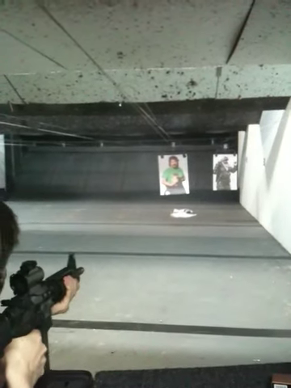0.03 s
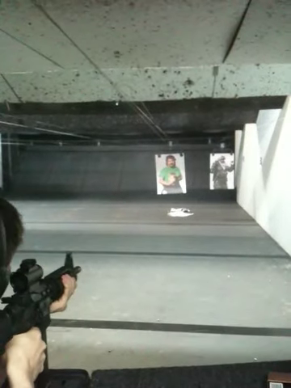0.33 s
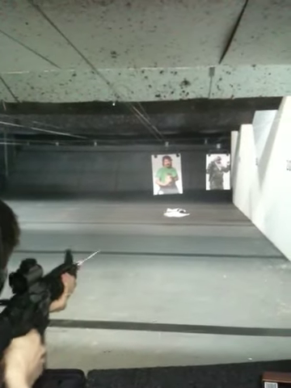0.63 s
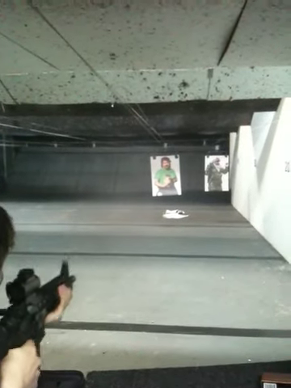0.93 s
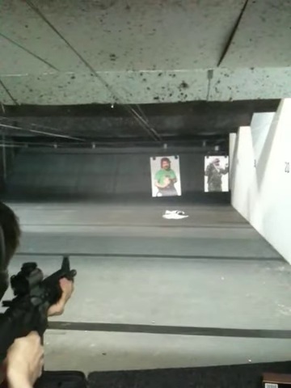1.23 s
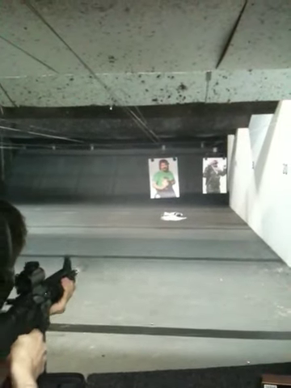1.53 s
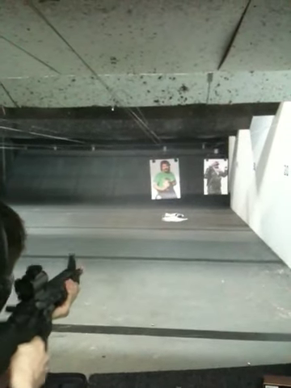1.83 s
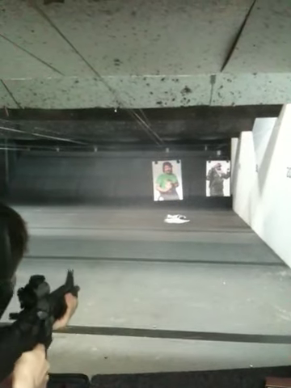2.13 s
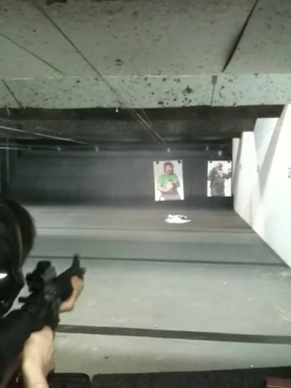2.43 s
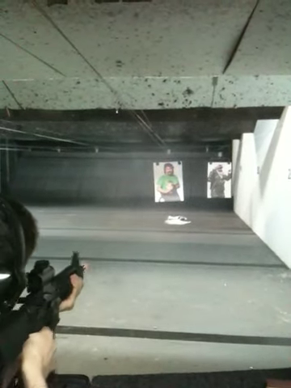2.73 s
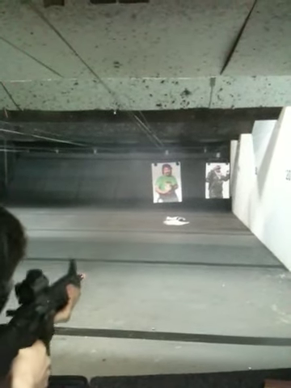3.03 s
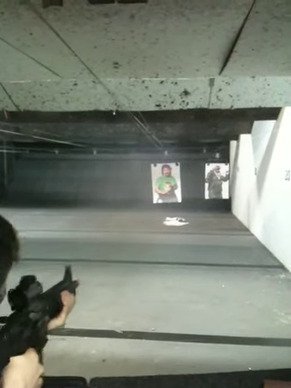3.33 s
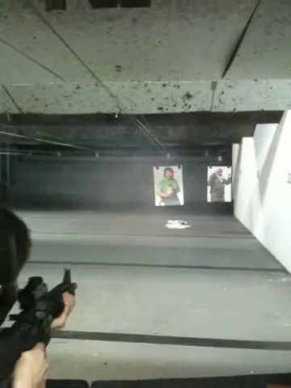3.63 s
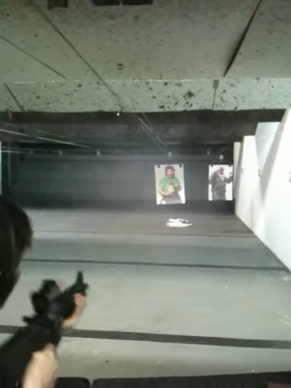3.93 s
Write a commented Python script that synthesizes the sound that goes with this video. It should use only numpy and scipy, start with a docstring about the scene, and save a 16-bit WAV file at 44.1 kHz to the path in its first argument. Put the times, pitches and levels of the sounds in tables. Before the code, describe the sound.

Rifle fire booms in a concrete shooting range while brass casings clink on the floor.

```python
"""Rifle shots in a concrete indoor range, heard from just behind the shooter.
First an earlier shot dies away while spent brass casings bounce on the floor and ring in their modes.
From 0.4 s, each muzzle blast and its dense reverberation overload the microphone for most of a second;
more casings sound as the tails decay. Lighter reports, probably from another lane, land inside the roar
at 2.1 s and 3.3 s, the second with a low push of air. A last blast follows at 3.7 s."""
import sys
import numpy as np
from scipy import signal
from scipy.fft import rfft, irfft, next_fast_len
from scipy.io import wavfile
from scipy.ndimage import map_coordinates

SR = 44100
rng = np.random.default_rng(int(sys.argv[2]) if len(sys.argv) > 2 else 0)


def store_pcm(level_fs):
    """Save levels as 16-bit WAV."""
    pcm = np.round(np.clip(level_fs, -1, 1) * 32767).astype(np.int16)
    wavfile.write(sys.argv[1], SR, np.atleast_2d(pcm).T)


N = 176400

# Shots: t/s, tail level 1 s later/dB, treble lift of the tail/dB, blast level over that tail level/dB
SHOT_EVENTS = [(-0.78, -22.7, -1.5, 40), (0.4103, -19.7, -1.5, 64), (1.5905, -23.5, 0, 48),
               (2.09, -47.5, 4.5, 44), (2.7472, -20, .5, 44), (3.272, -32.5, -3, 30), (3.68, -46, 5, 58)]
FLUTTER_DB, FLUTTER_RATE = .8, 22
def rifle_shot(onset, tail_db, lift_db, blast_db):
    """Superposition of blast and reverberation; uneven arrival of the echoes makes the level flutter."""
    age = since(onset)
    tail = reverberation(onset, lift_db)
    gain = amp(tail_db + FLUTTER_DB * wobble(FLUTTER_RATE))
    return gain * (age > 0) * (amp(blast_db) * muzzle_blast(age) + tail)


# Spectral density of the blast and its first reflections in the booth, at full flare: f/Hz, level/dB
BLAST_SPECTRUM = [(30, -26), (300, -10), (900, -9), (1650, 1), (2400, -7), (3300, -3), (4050, 3),
                  (5000, -9), (9000, -15), (16000, -25)]
FLARE_S, FLARE_WIDTH_S, FLARE_PITCH_DEPTH, FLARE_DB = .085, .055, .22, 7
def muzzle_blast(age):
    """A broadband transient: time scaling shifts its spectrum as pitch and level flare, then sink."""
    flare = np.exp(-((age - FLARE_S) / FLARE_WIDTH_S) ** 2)
    pitch_ratio = 1 - FLARE_PITCH_DEPTH * (1 - flare)
    roar = map_coordinates(noise(BLAST_SPECTRUM), [np.cumsum(pitch_ratio)], mode="mirror")
    return roar * amp(FLARE_DB * flare) * fade(np.maximum(age, 0), t60=.33)


# Spectral density of the reverberant field 1 s after a shot: f/Hz, level/dB
TAIL_SPECTRUM = [(25, -42), (70, -34), (130, -19), (180, -8.5), (250, -5.5), (340, -3.5), (470, -8),
                 (650, -7), (830, -1), (1200, .7), (1450, -5), (1650, -11.5), (2000, -11), (2500, -5.5),
                 (2900, -9), (3500, -5.5), (4050, -11.5), (4800, -21.5), (5900, -22), (7500, -31.5),
                 (10000, -44), (12000, -60), (16000, -80)]
# Reverberation time of the range: f/Hz, T60/s
REVERB_TIMES = [(100, 1.7), (350, 1.35), (1100, 1.28), (2000, 1.15), (3500, 1.08), (7000, .92), (15000, .7)]
LIFT_HZ = 1500
def reverberation(onset, lift_db):
    """A diffuse field decays exponentially in each band, the treble dying first."""
    hz, t, bands = signal.stft(noise(TAIL_SPECTRUM), SR, nperseg=512)
    age = np.maximum(t - onset, 0)
    decay = fade(age - 1, along(REVERB_TIMES, hz)[:, None])  # unity gain 1 s after the shot
    treble_lift = amp(lift_db * hz ** 4 / (hz ** 4 + LIFT_HZ ** 4))
    return signal.istft(bands * decay * treble_lift[:, None], SR, nperseg=512)[1][:N]


# Push of air on the microphone: t/s, duration/s, level/dB
AIR_PULSE = (3.2915, .0074, 30)
def air_push():
    """A single raised-cosine pressure pulse saturates the microphone for a few milliseconds."""
    centre, duration, db = AIR_PULSE
    return -amp(db) * np.cos(np.pi * np.clip(since(centre) / duration, -.5, .5)) ** 2


# Floor contacts: t/s, ring level/dB, ring f/Hz, click level/dB, click f/Hz
BOUNCES = [(.1125, -22, 10290, -14, 5700), (.2025, -16.5, 10310, -24, 4200), (.278, -40, 10300, -41, 12500),
           (1.135, -23, 10330, -30, 6000), (1.2575, -19, 10260, -26, 9200), (1.3190, -27, 10220, -12, 5900),
           (1.450, -21, 10380, -23, 4500), (2.465, -10.5, 10170, -32, 6000), (2.564, -13, 10290, -17, 6000),
           (2.688, -28, 10170, -28, 4800), (3.638, -16, 10400, -24, 6000)]
# Modes of a brass case: ratio to the ring frequency, level/dB, T60/s
BRASS_MODES = [(.985, -7, .08), (1, 0, .13), (1.011, -7, .08), (1.21, -28, .07)]
# Spectral density of brass striking concrete: f/Hz, level/dB
CLICK_SPECTRUM = [(500, -28), (3000, -9), (5500, -2), (8000, -5), (10500, -2), (13000, -6), (16000, -6)]
CLICK_PEAK_DB, RING_ROOM_DB, CLICK_ROOM_DB = 14, -6.5, -19
def casings():
    """Each impact clicks and excites the case's damped modes; the room's response prolongs the sound."""
    rings, clicks = np.zeros((2, N + SR))
    t = np.arange(SR // 2) / SR
    contact_noise = noise(CLICK_SPECTRUM)
    for onset, ring_db, ring_hz, click_db, click_hz in BOUNCES:
        start = round(onset * SR)
        ring = sum(amp(db) * fade(t, t60) * np.sin(2 * np.pi * (ratio * ring_hz * t + rng.random()))
                   for ratio, db, t60 in BRASS_MODES)
        grit = np.roll(contact_noise, -start)[:len(t)]
        resonance = signal.lfilter(*signal.iirpeak(click_hz, Q=7, fs=SR), grit)
        click = unit(grit + amp(CLICK_PEAK_DB) * resonance) * fade(t, t60=.02)
        rings[start:start + len(t)] += amp(ring_db) * ring
        clicks[start:start + len(t)] += amp(click_db) * click
    room = rng.standard_normal(len(t)) * fade(t, t60=.4)
    into_room = amp(RING_ROOM_DB) * rings + amp(CLICK_ROOM_DB) * clicks
    reflected = signal.fftconvolve(into_room, room / np.linalg.norm(room))
    return (rings + clicks)[:N] + reflected[:N]


# Spectral density of the ventilation: f/Hz, level/dB
VENT_SPECTRUM = [(25, -16), (60, -9), (120, 0), (350, -1), (1000, -6), (4000, -25), (16000, -66)]
VENT_DB = -45
def ventilation():
    """Stationary noise of moving air, strongest at low frequencies."""
    return amp(VENT_DB) * noise(VENT_SPECTRUM)


def amp(db):
    """Level to amplitude ratio."""
    return 10 ** (np.asarray(db) / 20)


def unit(x):
    """Normalisation to rms 1."""
    return x / np.sqrt(np.mean(x ** 2) + 1e-20)


def fade(t, t60):
    """Exponential decay, 60 dB down at t60."""
    return np.exp(-np.log(1000) * t / t60)


def along(points, hz):
    """Interpolation on a logarithmic frequency axis."""
    f, v = np.transpose(points)
    return np.interp(np.log(hz + 1), np.log(f + 1), v)


def since(s):
    """Seconds since time s, for every sample."""
    return np.arange(N) / SR - s


def wobble(rate):
    """Smooth random modulation, rate knots a second."""
    return map_coordinates(rng.standard_normal(N // 100), [np.arange(N) * rate / SR], mode="mirror")


def filtered(x, response):
    """Linear filtering: the spectrum times a frequency response."""
    m = next_fast_len(N + SR // 2)
    return irfft(rfft(x, m) * response(np.fft.rfftfreq(m, 1 / SR)), m)[..., :N]


def noise(spectrum):
    """Coloured noise of rms 1."""
    return unit(filtered(rng.standard_normal(N), lambda hz: amp(along(spectrum, hz))))


def scene():
    """Sound pressures add linearly at a single microphone."""
    shots = sum(rifle_shot(*row) for row in SHOT_EVENTS)
    pressure = shots + air_push() + casings() + ventilation()
    return np.array([pressure, pressure])


# Frequency response after the overload: f/Hz, level/dB
OUTPUT_RESPONSE = [(20, 0), (70, -2), (150, -1), (300, .4), (1000, -.4), (4000, -.2), (6500, -1.2),
                   (10000, .7), (13000, .8), (16000, -.7)]
LIMIT_RMS_DB, LIMIT_AVERAGING_S = 7.5, .006
CEILING_DB, HARDNESS, CUTOFF_HZ = -4.7, 24, 15850
def record(dry):
    """Saturation: a fast limiter leaves loud sound above clipping; the wave rings in a steep low-pass."""
    mono = dry.mean(axis=0)
    pole = np.exp(-1 / (LIMIT_AVERAGING_S * SR))
    power = signal.lfilter([1 - pole], [1, -pole], mono ** 2)
    limited = mono / (1 + (power / amp(LIMIT_RMS_DB) ** 2) ** 2) ** (1 / 4)
    clipped = limited / (1 + np.abs(limited / amp(CEILING_DB)) ** HARDNESS) ** (1 / HARDNESS)
    smooth = signal.sosfilt(signal.ellip(8, .2, 70, CUTOFF_HZ, fs=SR, output="sos"), clipped)
    out = filtered(smooth, lambda hz: amp(along(OUTPUT_RESPONSE, hz)) * (hz < CUTOFF_HZ))
    return np.array([out, out])


dry = scene()
out = record(dry)
store_pcm(out)
```